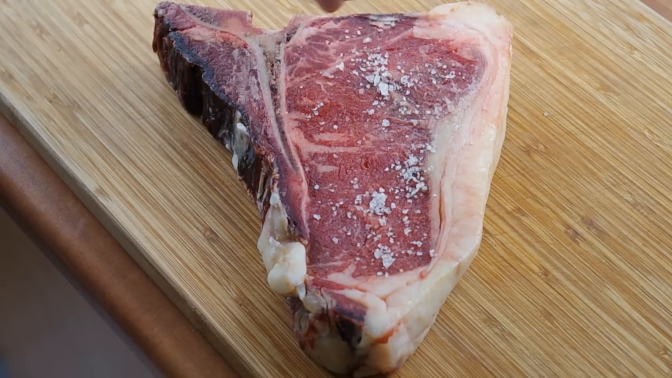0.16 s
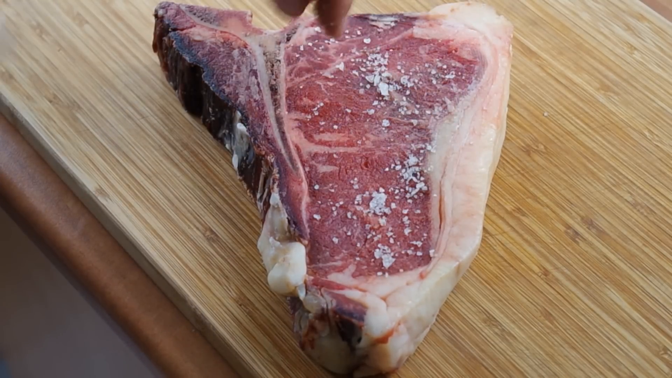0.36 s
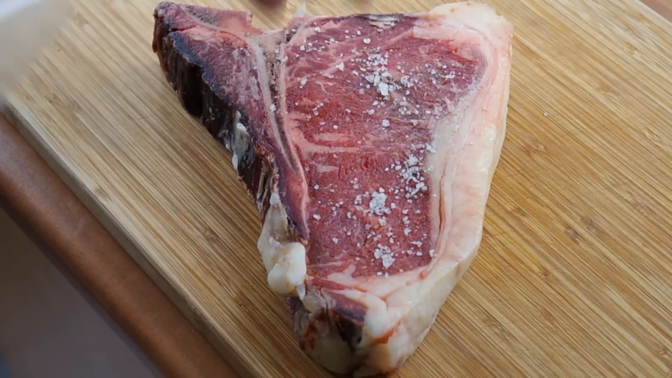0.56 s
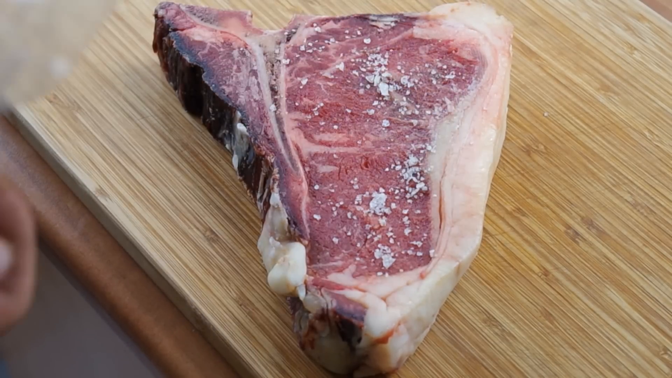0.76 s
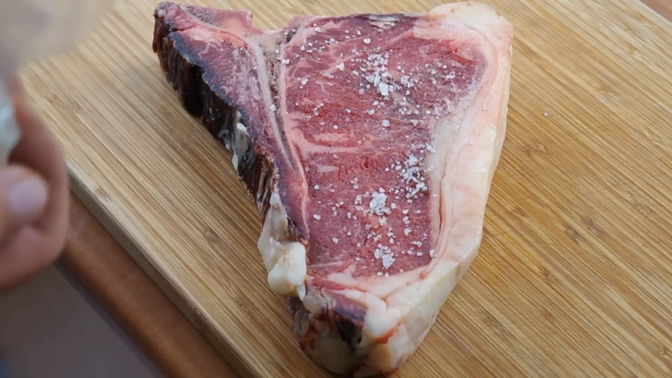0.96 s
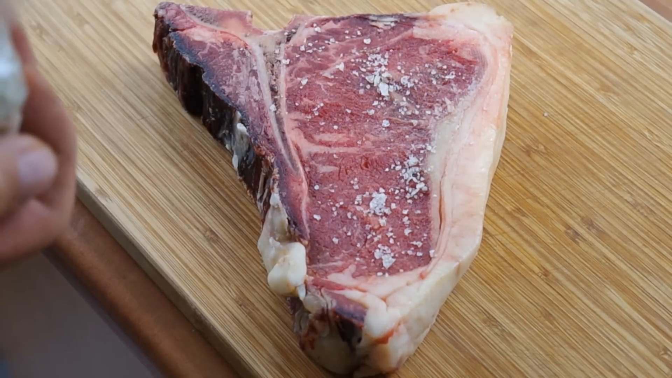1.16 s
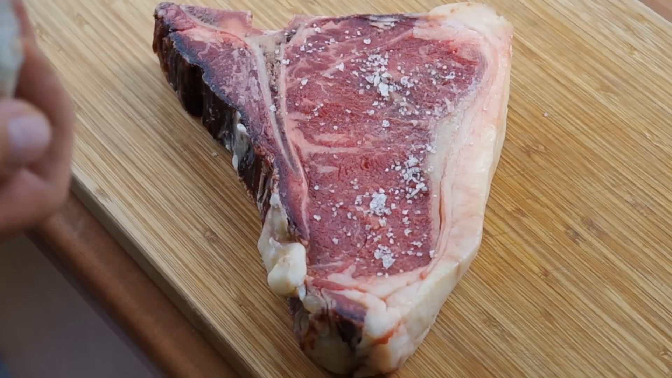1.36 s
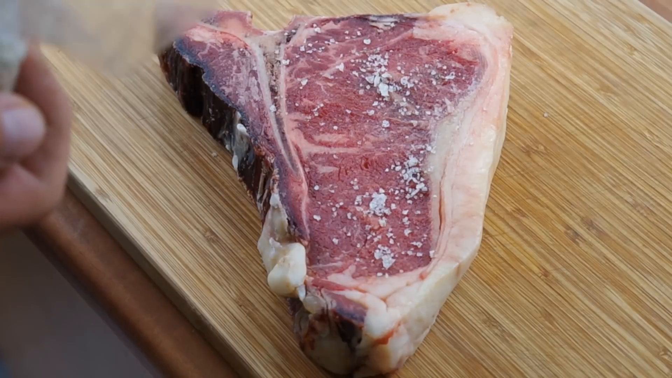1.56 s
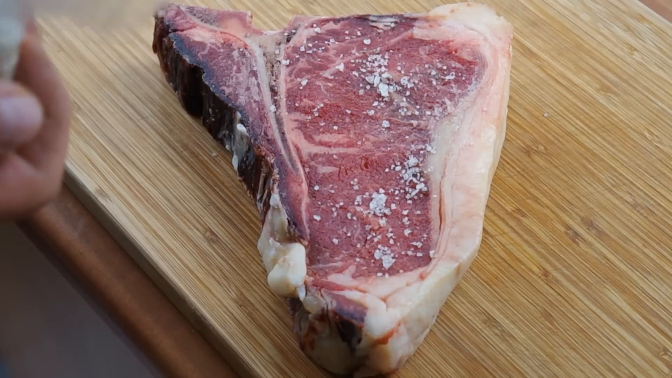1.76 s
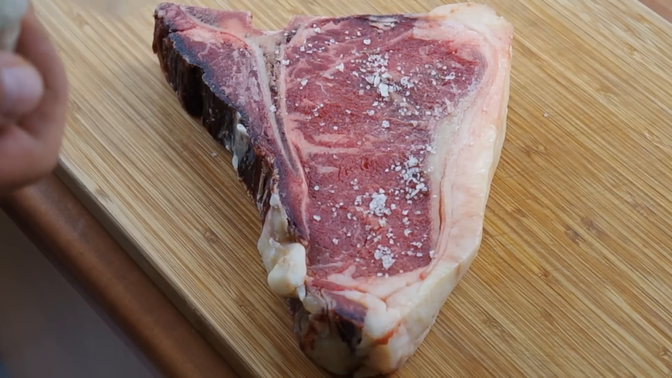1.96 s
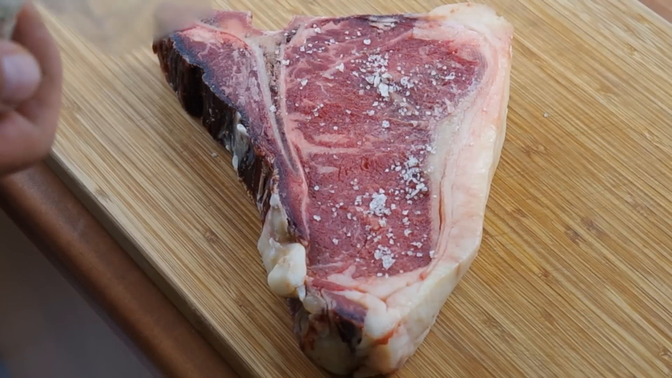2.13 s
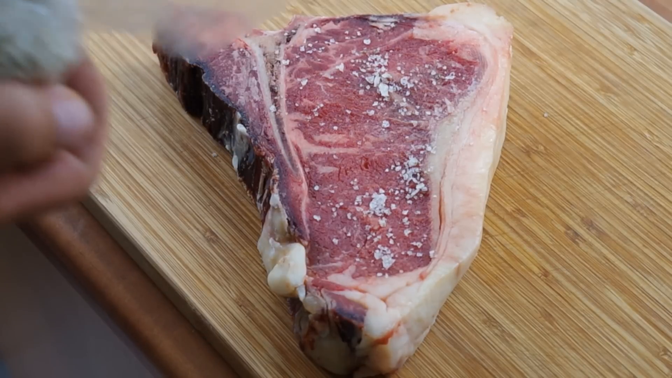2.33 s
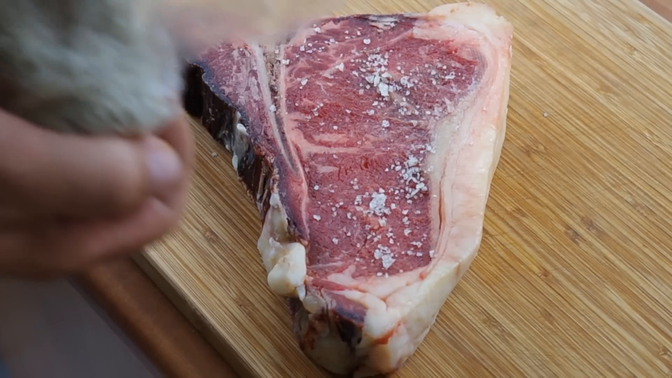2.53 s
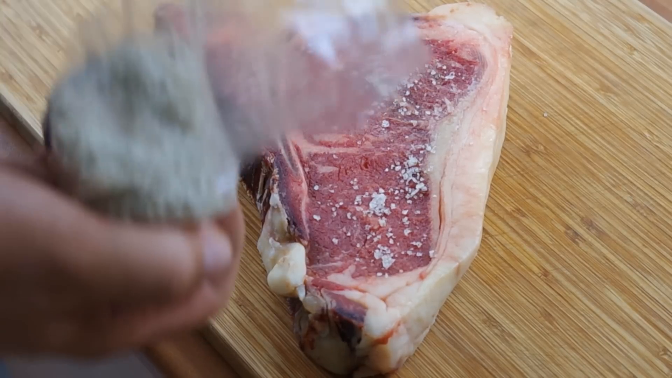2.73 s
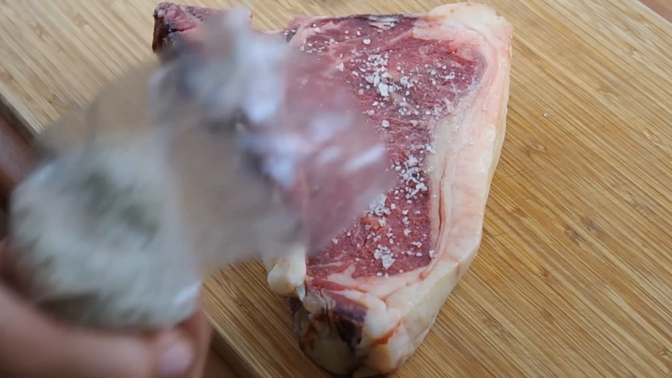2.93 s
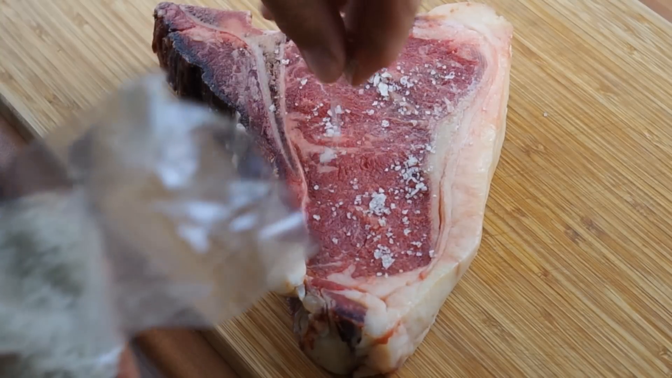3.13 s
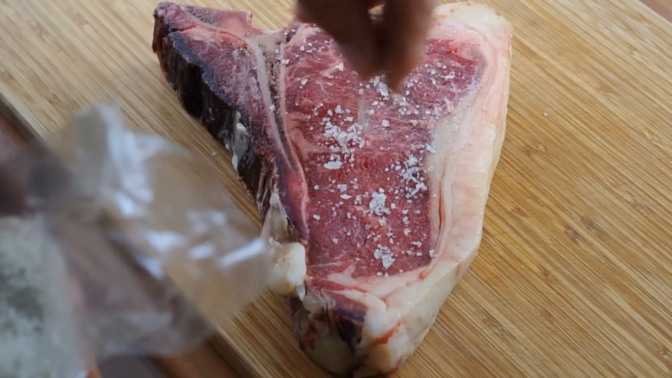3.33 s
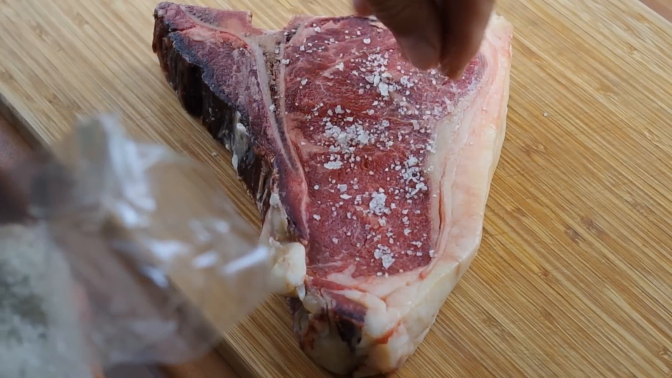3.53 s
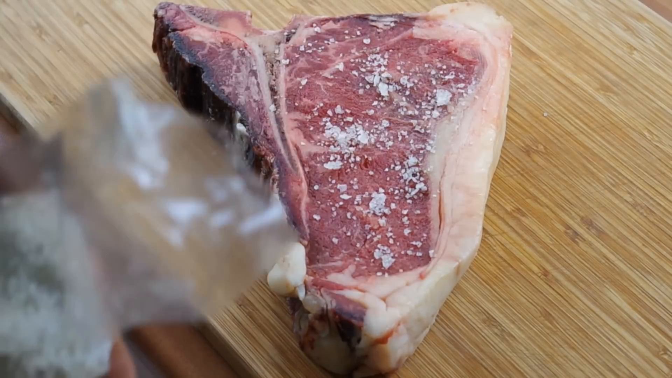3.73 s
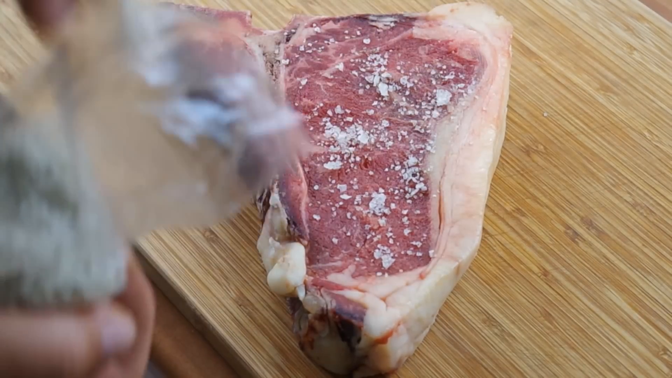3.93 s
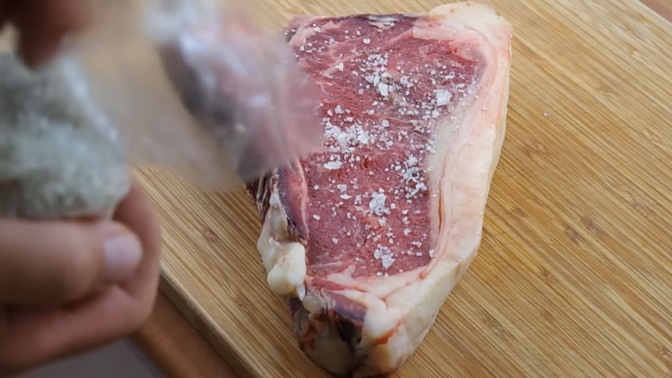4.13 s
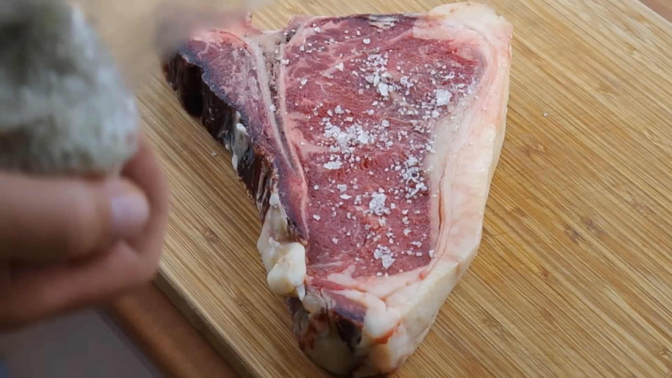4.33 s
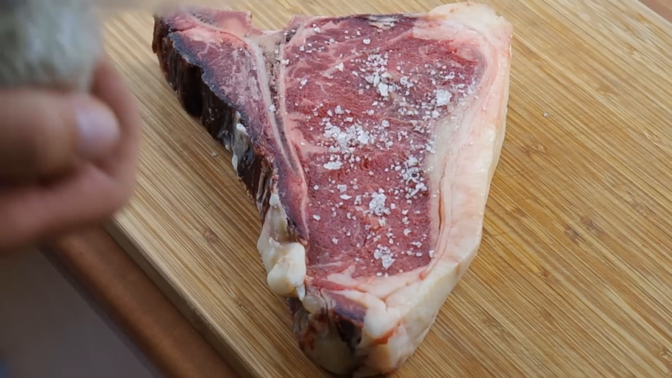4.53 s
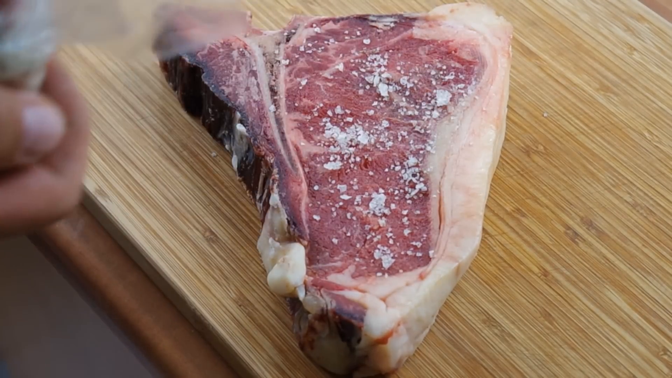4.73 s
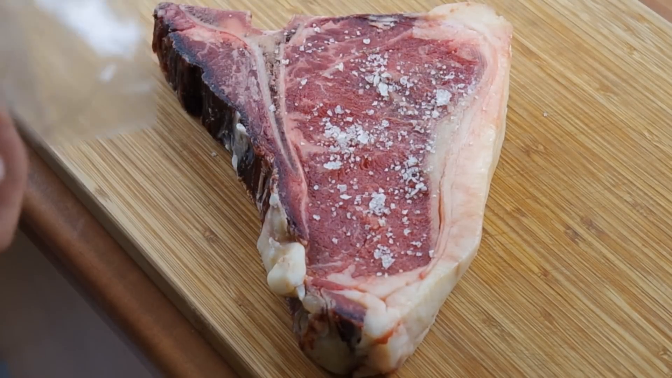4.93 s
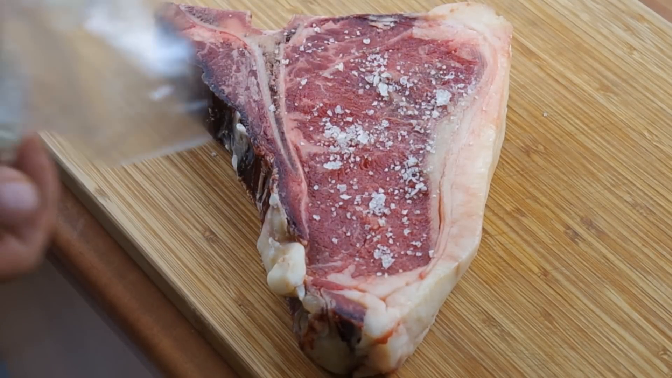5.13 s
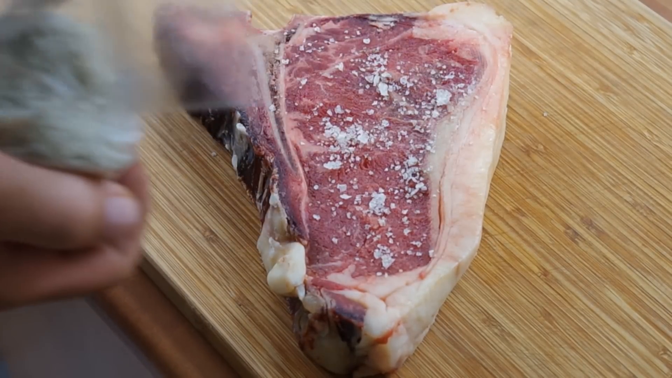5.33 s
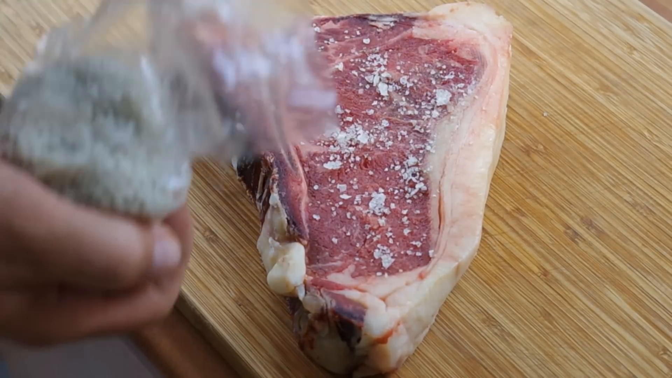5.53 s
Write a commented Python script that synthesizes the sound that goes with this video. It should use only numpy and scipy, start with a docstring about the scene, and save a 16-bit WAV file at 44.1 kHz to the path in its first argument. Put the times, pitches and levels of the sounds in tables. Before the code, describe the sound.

Fingers faintly crumble coarse salt over a steak, then dig into a stiff plastic bag, which crackles with sharp snaps while the salt crunches and lumps knock dully. A quieter pause follows with a soft trickle of grains, then a second, louder spell of crinkling. It is heard close up in a small kitchen with a faint low rumble.

```python
"""Coarse salt from a plastic bag

A hand digs into a stiff bag of coarse salt and crumbles pinches over meat on a board.
Creases in the film flip with snaps and crackle; the salt crunches dully, knocks and pours.
A small kitchen adds a short bright tail over a quiet rumble and a low appliance hum."""
import sys
import numpy as np
from scipy import signal
from scipy.fft import rfft, irfft, next_fast_len
from scipy.io import wavfile
from scipy.ndimage import uniform_filter1d

SR = 44100
rng = np.random.default_rng(int(sys.argv[2]) if len(sys.argv) > 2 else 0)


def dump_mix(stems):
    """Bounce the given channels to the path in sys.argv[1] as a 16-bit WAV at rate SR."""
    frames = np.atleast_2d(stems).T  # one column per channel
    limited = np.clip(frames, -1, 1)  # hard clip at full scale
    pcm = np.round(limited * 32767).astype(np.int16)
    wavfile.write(sys.argv[1], SR, pcm)


N = 251061

# room tone spectrum (frequency [Hz], density [dB])
AIR_SPECTRUM = [(29, -45), (50, -6.5), (85, -5.5), (106, -17), (159, -8.5), (198, -13), (277, -11.5),
                (802, -16.5), (2950, -28), (14500, -28), (16000, -48)]
# house shudder (time [s], level [dB])
RUMBLE_LEVELS = [(0.0, -63.5), (1.63, -59), (1.93, -72), (2.38, -55.5), (2.68, -69), (3.45, -54.5),
                 (3.93, -60), (4.31, -49.5), (5.04, -57.5), (5.69, -58)]
# distant appliance (time [s], pitch [Hz], level [dB])
HUM_TRACK = [(1.9, 72, -82), (2.02, 73.2, -71.5), (4.63, 73.36, -57), (5.46, 74.6, -68), (5.56, 71, -63),
             (5.69, 71.5, -88)]
# kitchen decay (frequency [Hz], t60 [s])
KITCHEN_T60 = [(300, 0.36), (1500, 0.21), (5000, 0.3), (12000, 0.16)]
# reflections off board and walls (delay [s], level [dB])
EARLY_BOUNCES = [(.0031, -15.5), (.0047, -14.5), (.0072, -16)]
# faint whistles (start [s], length [s], from [Hz], to [Hz], level [dB])
WHISTLE_GLIDES = [(0.4, .15, 10750, 10450, -75), (0.6, 0.09, 7550, 7870, -64),
                  (3.279, 0.14, 7750, 7100, -68)]
# narrow ringing bands: hollow folds of the bag, and the pouring salt at 2.958 s (time [s], pitch [Hz], level
# [dB], t60 [s])
BAND_RINGS = [(0.0, 2540, -51.5, 0.55), (0.0, 3680, -45, 0.31), (0.999, 1320, -44.5, 0.21),
              (1.13, 2110, -48, 1.5), (1.362, 1320, -43.5, 0.25), (1.41, 3300, -33, 0.086),
              (2.432, 3600, -36, 0.13), (2.958, 4750., -47, 0.18), (2.958, 5340, -47, 0.17),
              (5.41, 3900, -35, .15)]
# how hard the hand works the bag (time [s], crackle level [dB])
HAND_EFFORT = [(0.08, -46.5), (0.19, -62.5), (0.7, -62), (0.77, -74), (0.95, -62), (1.02, -35.5),
               (1.38, -44), (1.56, -28), (1.72, -42), (1.94, -39), (2.03, -45.5), (2.34, -46),
               (2.41, -37.5), (2.64, -44), (2.75, -36.5), (2.83, -51), (3.3, -55.5), (3.55, -63.5),
               (4.02, -58.5), (4.11, -28.5), (4.31, -39.5), (4.52, -24.5), (4.66, -33.5), (4.73, -27),
               (4.89, -38), (5.24, -38), (5.38, -33), (5.43, -32), (5.5, -25.5), (5.61, -51), (5.69, -51)]
# opening crunch spectrum (frequency [Hz], density [dB])
OPENING_SPECTRUM = [(590, -18), (1000, -20.5), (2320, -13), (3100, -31), (3740, -22), (4250, -6),
                    (4730, -1), (6560, -3.5), (9410, 3), (12000, -4), (14800, -25), (16300, -37)]
# salt crunch spectrum (frequency [Hz], density [dB])
CRUNCH_SPECTRUM = [(71, -48), (120, -21), (542, -1), (929, -5.5), (1060, 0), (1180, -6.5), (1280, -2.5),
                   (3000, -10), (3900, -8.5), (6600, -120)]
# fine salt pouring, with ringing bands (frequency [Hz], density [dB])
POUR_SPECTRUM = [(880, -30), (2300, -20), (2710, -6), (3100, -19), (4350, -19), (4940, -3), (5600, -11),
                 (7200, -6), (7750, 1), (8300, -5), (10800, 1), (14100, -2), (14900, -6), (15700, -12)]
# salt lumps shifting or landing (time [s], level [dB], pitch [Hz])
LUMP_KNOCKS = [(0.528, -38, 1850), (0.62, -43, 1420), (0.8, -39, 2220), (0.985, -34.5, 300),
               (0.994, -28.5, 1390), (1.088, -31.5, 493), (1.124, -22, 1860), (1.363, -31, 1350),
               (1.407, -23, 1570), (1.566, -31, 726), (1.668, -23.5, 510), (2.392, -30, 1960),
               (2.464, -28.5, 1800), (2.74, -28, 1550), (2.884, -39.5, 860), (3.24, -46.5, 1140),
               (3.795, -33.5, 600), (3.867, -29.5, 530), (4.092, -26.5, 1750), (4.237, -20, 1140),
               (4.398, -19.5, 1730), (4.484, -28, 1100), (4.506, -17, 1060), (4.548, -21, 570),
               (4.562, -25, 800), (4.718, -31, 300), (4.73, -26, 2490), (4.791, -45, 1720),
               (5.479, -26.5, 540)]
# film crackle spectrum (frequency [Hz], density [dB])
FILM_SPECTRUM = [(880, -26.5), (1500, -11), (1760, -8), (3100, -7), (6050, -5), (11500, 0), (13800, 0),
                 (15000, -18), (15800, -3)]
# single snaps of the film (time [s], snap level [dB], shower level [dB])
FILM_SNAPS = [(0.2533, -33, -64), (0.395, -36, -55), (0.5265, -50, -50), (0.639, -36, -51),
              (0.6788, -36, -57), (0.8, -50, -51.5), (0.839, -26, -58.5), (0.898, -47, -75),
              (0.9405, -32, -66), (0.978, -33, -37.5), (0.988, -34, -39), (1.082, -8, -45),
              (1.112, -12, -33), (1.1229, -9, -30), (1.126, -11, -23.5), (1.1575, -20, -36),
              (1.239, -19, -42), (1.271, -15, -56), (1.3865, -19, -38), (1.391, -19, -30.5),
              (1.4105, -3.5, -19.5), (1.4146, -2, -41), (1.4163, -3, -48), (1.419, -10, -49),
              (1.484, -13, -30), (1.532, -16, -26), (1.534, -16, -37), (1.542, -8, -31), (1.567, -18, -30),
              (1.609, -17, -39), (1.629, 7, -28), (1.632, -11, -34), (1.6364, -8, -37), (1.6651, 1, -23),
              (1.682, 6, -29), (1.7815, -11, -35), (1.862, -6.5, -35.5), (1.8707, -10.5, -32.5),
              (1.934, -22, -27.5), (1.9556, -6, -41), (2.0411, 2.5, -25.5), (2.1262, -13, -32),
              (2.166, -19, -43), (2.197, -5, -28.5), (2.2926, -18, -31), (2.319, -18, -42.5),
              (2.397, -8.5, -52), (2.4305, -13, -24.5), (2.5612, 1, -49), (2.5942, -24, -25),
              (2.694, -26, -27.5), (2.738, -8, -22.5), (2.9613, -15, -37.5), (3.055, -25, -50),
              (3.7971, -17, -37), (3.8675, -31, -42), (3.9415, -36, -50), (4.059, -19, -31.5),
              (4.0787, -25, -39), (4.0924, -9, -17.5), (4.1148, -10, -28.5), (4.144, -15, -27.5),
              (4.1955, -8, -28), (4.204, -10, -48), (4.239, -1, -16), (4.2401, 5.5, -28.5),
              (4.264, -8, -33), (4.3278, -3, -35), (4.334, -14, -45), (4.365, -5, -30), (4.4004, -10, -22),
              (4.484, -11, -27), (4.506, 1.5, -17), (4.51, -2, -29), (4.531, -9, -30.5), (4.5635, 0.5, -25),
              (4.649, -7, -26.5), (4.665, -1.5, -27), (4.687, -3, -32), (4.696, -8, -35), (4.706, -7, -26),
              (4.7196, -8, -17.5), (4.794, 3, -31), (4.8, 3, -38), (4.884, -7, -22.5), (4.9589, -24, -24),
              (4.997, -1, -27.5), (5.1256, -26, -35), (5.25, -32, -30), (5.294, -6, -34), (5.297, 4, -39),
              (5.3193, 5, -31), (5.356, -28, -33), (5.39, -20, -27.5), (5.41, 4, -33), (5.412, 2.5, -30),
              (5.45, -19, -19), (5.491, 8, -28), (5.506, -5, -33), (5.668, -33, -40)]

CREASE_HZ, CREASE_SPREAD = 11520, 0.29
TIME_S = np.arange(N) / SR


def gain_of(db):
    return 10 ** (np.asarray(db) / 20)


def unit_rms(x):
    return x / np.sqrt(np.mean(x ** 2) + 1e-20)


def at_hz(table, hz):
    table_hz, value = np.transpose(table)
    return np.interp(np.log(hz + 1), np.log(table_hz + 1), value)


def add(mix, start_s, sound):
    part = mix[round(start_s * SR):][:len(sound)]
    part += sound[:len(part)]


def highpass(x, hz, order):
    return signal.sosfilt(signal.butter(order, hz, "high", fs=SR, output="sos"), x)


def coloured(x, spectrum):
    """Imposes a long-term spectrum; unit RMS."""
    size = next_fast_len(N)
    bins, hz = rfft(x, size), np.fft.rfftfreq(size, 1 / SR)
    envelope = np.sqrt(uniform_filter1d(abs(bins) ** 2, size=2001) + 1e-20)
    return unit_rms(irfft(bins / envelope * gain_of(at_hz(spectrum, hz)), size)[:N])


def ring(hz, cycles):
    """Damped sine, peak 1, down by 1/e after `cycles`."""
    turns = hz * np.arange(1, 800) / SR
    wave = np.sin(2 * np.pi * turns) * np.exp(-turns / cycles)
    return wave / abs(wave).max()


def drift(noise, rows, columns):
    """Smooths a noise grid along both axes; unit RMS."""
    return unit_rms(uniform_filter1d(uniform_filter1d(noise, rows, axis=0), columns, axis=1))


def grains(low_hz, high_hz, cycles, per_s, spread_db, clump_db, patch_db, patches=16):
    """Tiny slips in clumps, a few large, each ringing its own patch."""
    clumps = unit_rms(uniform_filter1d(rng.standard_normal(N), size=350))
    slips = gain_of(spread_db * np.minimum(rng.exponential(1, N), 4) + clump_db * clumps)
    slips *= rng.choice([-1., 1.], N) * (rng.random(N) < per_s / SR)
    patch = rng.integers(0, patches, N)
    # patches of like pitch wake and rest together for tens of ms
    activity = drift(rng.standard_normal((N // 256 + 1, patches)), 7, 3)
    slips *= gain_of(patch_db * activity[np.arange(N) // 256, patch])
    pitches = np.geomspace(low_hz, high_hz, patches)
    return sum(signal.oaconvolve(slips * (patch == k), ring(hz, cycles))[:N]
               for k, hz in enumerate(pitches))


def room_air(level_db=-60):
    """Soft noise with a slightly drifting spectrum."""
    hz = np.fft.rfftfreq(2048, 1 / SR)
    real, imag, patches = rng.standard_normal((N // 512 + 5, 1025, 3)).T
    bins = (real + 1j * imag) * gain_of(at_hz(AIR_SPECTRUM, hz)[:, None] + 0.34 * drift(patches, 12, 8))
    return gain_of(level_db) * unit_rms(signal.istft(bins, nperseg=2048, noverlap=1536)[1][:N])


def house_rumble(band_hz=(12., 36.)):
    """The house shudders in slow swells."""
    low = signal.sosfilt(signal.butter(2, band_hz, "band", fs=SR, output="sos"), rng.standard_normal(N))
    return gain_of(np.interp(TIME_S, *np.transpose(RUMBLE_LEVELS))) * unit_rms(low)


def appliance_hum(fade_in_s=0.18, waver_db=2.0):
    """One distant low tone of wavering level."""
    times_s, hz, db = np.transpose(HUM_TRACK)
    turns = np.cumsum(np.interp(TIME_S, times_s, hz)) / SR
    waver = unit_rms(uniform_filter1d(rng.standard_normal(N), size=2500))
    level = gain_of(np.interp(TIME_S, times_s, db) + waver_db * waver)
    fade_in = np.clip((TIME_S - times_s[0]) / fade_in_s, 0, 1)
    return np.sqrt(2) * fade_in * level * np.sin(2 * np.pi * turns)


def echo_path(tail_db=-7.0):
    """Early bounces, then sparse taps; each band decays at its own rate."""
    taps = np.zeros(SR // 2)
    slots = np.arange(200, len(taps) - 10, 10)
    taps[slots + rng.integers(0, 10, len(slots))] = rng.choice([-1., 1.], len(slots))
    hz, t, bins = signal.stft(taps, SR, nperseg=128)
    decay = gain_of(-60 * t / at_hz(KITCHEN_T60, hz)[:, None])
    response = signal.istft(bins * decay, SR, nperseg=128)[1]
    response *= gain_of(tail_db) / np.linalg.norm(response)
    for delay_s, db in EARLY_BOUNCES:
        add(response, delay_s * rng.uniform(.85, 1.15), gain_of([db]))
    return response


def kitchen(direct, paths=8):
    """Adds echoes. The hands move, so the path is redrawn every 15 ms."""
    path = np.repeat(rng.integers(0, paths, N // 660 + 1), 660)[:N]
    return direct + sum(signal.oaconvolve(direct * (path == k), echo_path())[:N] for k in range(paths))


def whistles():
    """Thin tones that glide, waver and fade in and out."""
    out = np.zeros(N)
    for start_s, length_s, from_hz, to_hz, db in WHISTLE_GLIDES:
        progress = np.arange(0, length_s, 1 / SR) / length_s
        waver = 1 + 0.014 * unit_rms(uniform_filter1d(rng.standard_normal(SR), size=200))[:len(progress)]
        turns = np.cumsum((from_hz + (to_hz - from_hz) * progress) * waver) / SR
        fade = np.sqrt(2 * np.sin(np.pi * progress))
        add(out, start_s, gain_of(db) * fade * np.sin(2 * np.pi * turns))
    return out


def band_rings(q=25.):
    """Air shut in a fold, or pouring salt, rings as a narrow, decaying noise band."""
    out, t = np.zeros(N), np.arange(SR // 2) / SR
    for start_s, hz, db, t60_s in BAND_RINGS:
        band = signal.lfilter(*signal.iirpeak(hz, q, SR), rng.standard_normal(len(t)))
        add(out, start_s, gain_of(db - 60 * t / t60_s) * unit_rms(band))
    return out


def opening_crunch(level_db=-22, t60_s=0.15):
    """A crunch dying away at the start."""
    return gain_of(level_db - 60 * TIME_S / t60_s) * coloured(rng.standard_normal(N), OPENING_SPECTRUM)


def slide_power(relative_db=-19, rise_s=0.0035, t60_s=.25):
    """Power envelope of salt sliding and settling after each knock."""
    power, t = np.zeros(N), np.arange(SR // 2) / SR
    for start_s, knock_db, _ in LUMP_KNOCKS:
        level = np.minimum(t / rise_s, 1) * gain_of(knock_db + relative_db - 60 * t / t60_s)
        add(power, start_s, level ** 2)
    return power


def salt_crunch(effort_db):
    """Dull slips in the salt, driven by the hand and by the slides."""
    pressed = gain_of(-50.5 + 0.85 * (effort_db + 40))
    slips = grains(230, 2330, cycles=0.99, per_s=1500, spread_db=1.5, clump_db=0.5, patch_db=1.0)
    return np.sqrt(pressed ** 2 + slide_power()) * coloured(slips, CRUNCH_SPECTRUM)


def lump_knocks(ring_s=.0007, overtone_ring_s=.0003, rattle_db=-28.0, rattle_t60_s=0.035):
    """Lumps knock and rattle. All ring equally briefly, so low knocks are dry."""
    out, t = np.zeros(N), np.arange(1800) / SR
    for start_s, db, hz in LUMP_KNOCKS:
        force = rng.standard_normal(len(t)) * gain_of(rattle_db - 60 * t / rattle_t60_s)
        force[0] = 1  # the impact
        overtone_hz = 2.6 * hz
        lump = ring(hz, hz * ring_s) + 0.7 * ring(overtone_hz, overtone_hz * overtone_ring_s)
        add(out, start_s, gain_of(db) * signal.fftconvolve(force, lump))
    return out


def crackle_and_pour(effort_db, strays_per_s=40, stray_over_db=9):
    """A firm grip crackles the film, a light one pours fine salt; stray snaps top both."""
    slips = grains(2000, 14000, cycles=2.5, per_s=6000, spread_db=2.2, clump_db=1.5, patch_db=3)
    crackle = coloured(slips, FILM_SPECTRUM)
    pour = coloured(rng.standard_normal(N), POUR_SPECTRUM)
    firmness = np.clip((effort_db + 52) / 14, 0, 1)
    kicks = gain_of(stray_over_db + 6.8 * rng.standard_normal(N)) * (rng.random(N) < strays_per_s / SR)
    strays = signal.oaconvolve(kicks, ring(CREASE_HZ, cycles=0.55))[:N]
    return gain_of(effort_db) * (np.sqrt(firmness) * crackle + np.sqrt(1 - firmness) * pour + strays)


def crease_pitches_hz():
    """A random pitch for each snap, drawn afresh on every call: creases differ in size."""
    return CREASE_HZ * (1 + CREASE_SPREAD * (2 * rng.random(len(FILM_SNAPS)) - 1))


def snap_showers(cluster_t60_s=0.029, tail_t60_s=0.2):
    """Each snap frees nearby creases: a cluster of slips leaning to one pitch, then a tail."""
    slips = grains(2076, 14450, cycles=1.06, per_s=8000, spread_db=2.5, clump_db=0.6, patch_db=0.5)
    slips = coloured(slips, FILM_SPECTRUM)
    out = np.zeros(N)
    for (start_s, _, db), hz in zip(FILM_SNAPS, crease_pitches_hz()):
        shower = slips[round(start_s * SR):][:9000]
        pitched = signal.lfilter(*signal.iirpeak(hz, 2.5, SR), shower)
        t = np.arange(len(shower)) / SR
        decay = gain_of(-60 * t / tail_t60_s) + 0.66 * gain_of(-60 * t / cluster_t60_s)
        add(out, start_s, gain_of(db) * decay * (.5 * shower + 0.24 * pitched))
    return out


def film_snaps(aftershock_window_s=.008):
    """A crease flips with a sharp ring and three weaker aftershocks."""
    out = np.zeros(N)
    for (start_s, db, _), hz in zip(FILM_SNAPS, crease_pitches_hz()):
        add(out, start_s, gain_of(db) * ring(hz, cycles=1.0))
        for late, weaker in rng.random((3, 2)):
            aftershock = gain_of(db - 14.25 - 9.5 * weaker) * ring(hz, cycles=3.2)
            add(out, start_s + aftershock_window_s * late, aftershock)
    return highpass(out, hz=3000., order=1)  # the snaps stay high, with no low end


def scene():
    """Bag and salt in the kitchen, over the room's background; mono."""
    effort_db = np.interp(TIME_S, *np.transpose(HAND_EFFORT))
    handling = crackle_and_pour(effort_db) + salt_crunch(effort_db) + opening_crunch() + snap_showers()
    impacts = highpass(film_snaps() + lump_knocks(), hz=250., order=2)  # snaps and knocks carry no deep bass
    direct = handling + impacts + band_rings() + whistles()
    return (kitchen(direct) + room_air() + house_rumble() + appliance_hum())[None]


def record(dry):
    """The input stage rounds off the loudest snaps; a low-pass follows."""
    ceiling, cutoff_hz = .7, 15850
    rounded = ceiling * np.tanh(dry / ceiling)
    lowpass = signal.firwin(511, cutoff_hz, window=("kaiser", 9), fs=SR)
    return signal.oaconvolve(rounded, lowpass[None], "same")


dry = scene()
out = record(dry)
dump_mix(out)
```